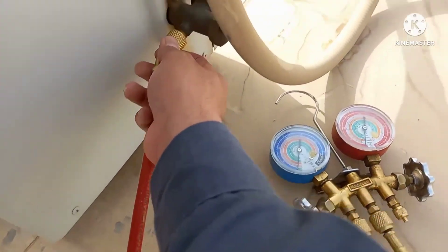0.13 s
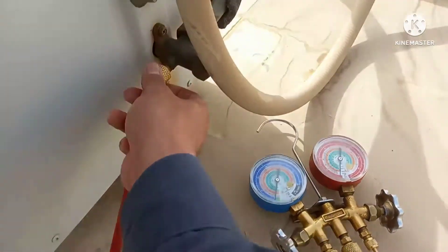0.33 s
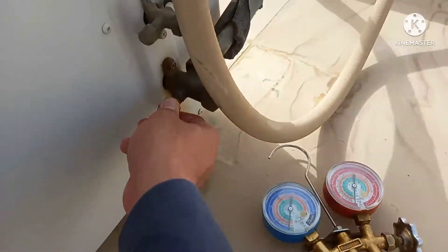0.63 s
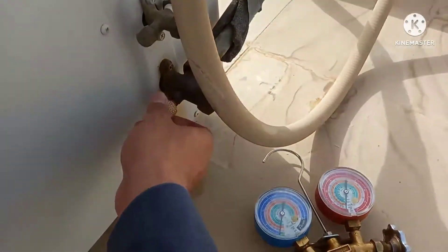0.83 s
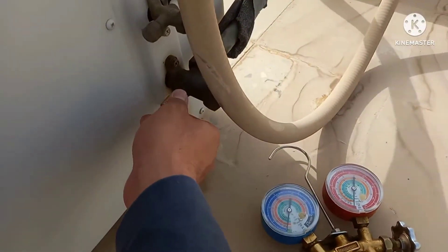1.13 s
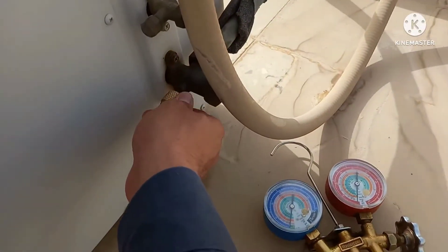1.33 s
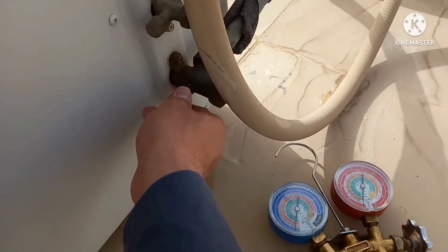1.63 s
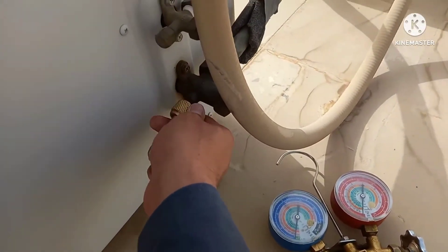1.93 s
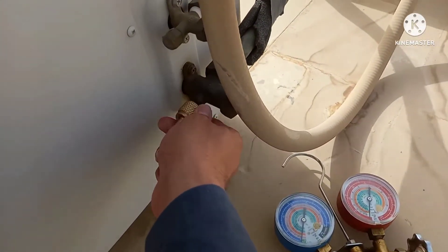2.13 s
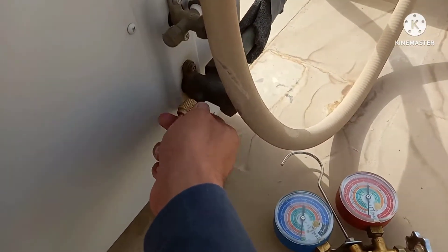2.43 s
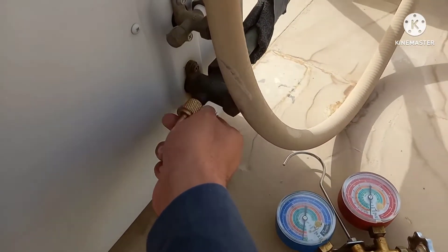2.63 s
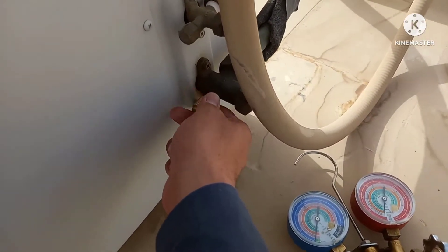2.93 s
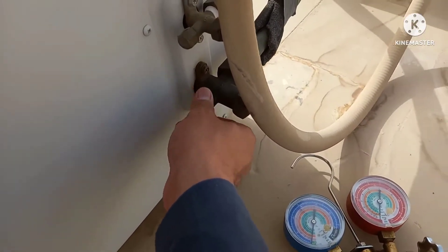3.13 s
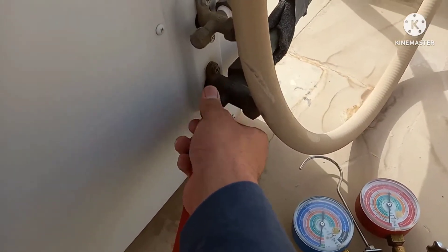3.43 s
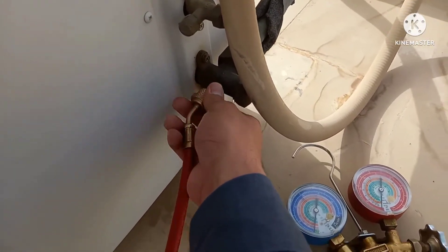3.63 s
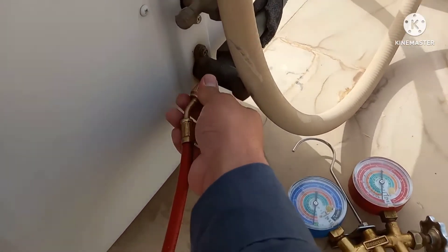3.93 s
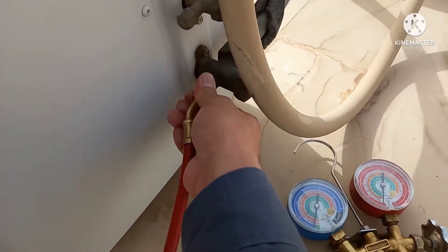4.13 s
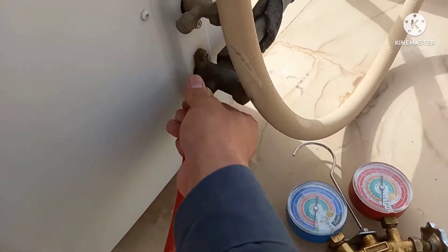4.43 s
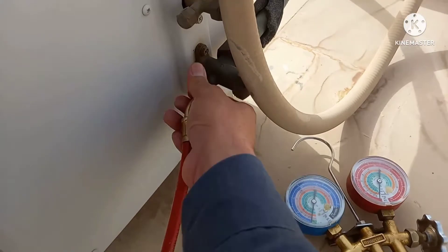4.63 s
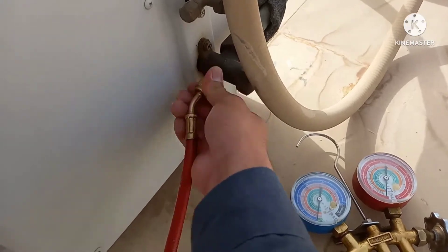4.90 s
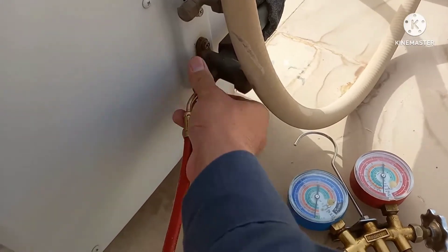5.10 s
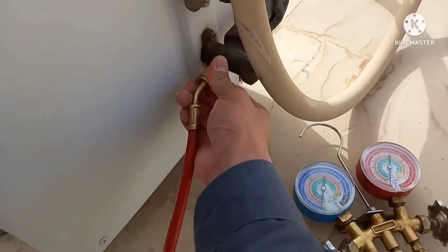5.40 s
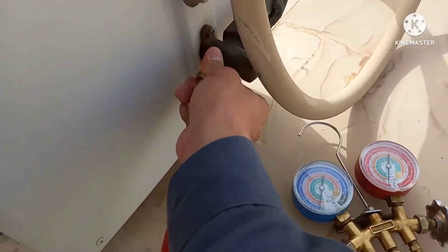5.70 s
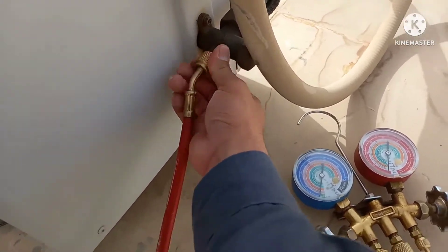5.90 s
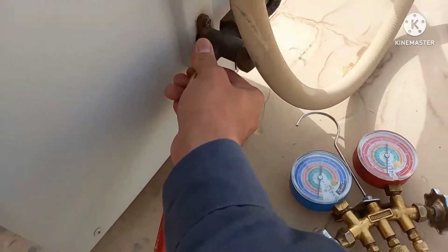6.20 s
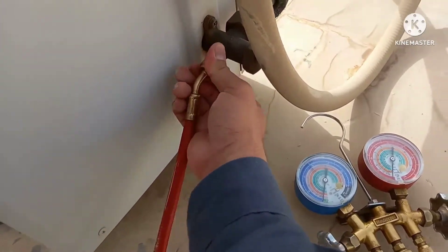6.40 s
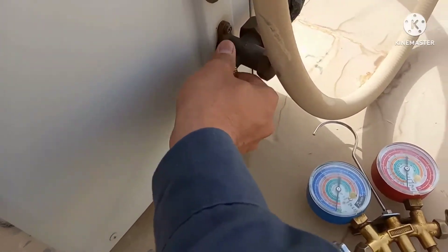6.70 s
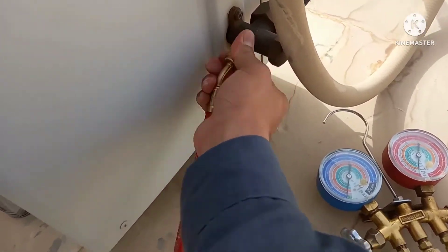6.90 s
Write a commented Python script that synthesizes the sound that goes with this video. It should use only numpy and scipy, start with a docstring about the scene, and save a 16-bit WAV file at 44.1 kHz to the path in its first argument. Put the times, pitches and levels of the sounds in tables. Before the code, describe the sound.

An outdoor air conditioner hums and blows steadily up close while a hand turns a brass fitting with small clicks and rasps.

```python
"""Rooftop air conditioner, close up

A stereo microphone moves in on an outdoor unit, which grows louder: the compressor hums, the fan throbs
and pushes air through the grille, and the mains hum beats against a second, slightly faster compressor.
A side panel's echo colours the rush. A hand turns a brass hose fitting on the service valve, with ticks,
rasps and soft rustles. Now and then an eddy of the fan's draught buffets the right microphone port."""
import sys
import numpy as np
from scipy.fft import rfft, irfft, next_fast_len
from scipy.io import wavfile
from scipy.ndimage import map_coordinates

SR = 44100
rng = np.random.default_rng(int(sys.argv[2]) if len(sys.argv) > 2 else 0)


def transcribe(signal):
    """Save signal, clipped to [-1, 1], as a 16-bit WAV file at the path in sys.argv[1]."""
    frames = np.atleast_2d(signal).T
    limited = np.clip(frames, -1, 1)
    pcm = np.round(limited * 32767).astype(np.int16)
    wavfile.write(sys.argv[1], SR, pcm)


N = 310949

COMPRESSOR_HZ, FAN_HZ, MAINS_HUM_HZ, NEIGHBOUR_HZ = 58.16, 14.99, 119.95, 58.605
LEFT_LAG_S = -24 / SR  # negative: the sound reaches the left port first

# closeness to the unit; each layer follows it by its own factor: (time [s], level [dB])
NEARNESS = [(0, -2), (0.75, -4), (1.4, 1.6), (2.6, 1.2), (3.7, 0.5), (4.4, -0.4), (6.1, -0.7), (6.7, 0.2),
            (7.05, -0.1)]
# compressor shaft harmonics: (order, left base level [dB], right base level [dB])
COMPRESSOR_TONES = [(1, -42, -40), (2, -46, -47), (3, -38, -38), (4, -37.5, -38), (5, -66, -51),
                    (6, -44.5, -40), (7, -42.5, -41.5), (8, -57, -54), (9, -53, -59), (10, -60, -58),
                    (13, -44, -52), (14, -47, -61), (15, -49.5, -61), (16, -54, -62), (17, -60, -76),
                    (18, -58, -64), (19, -65, -62), (26, -65, -70), (27, -59, -65), (28, -66, -71),
                    (30, -68, -68), (34, -71, -71), (97, -81, -79), (112, -79, -76)]
# shaft harmonics of the three-bladed fan: (order, left base level [dB], right base level [dB])
FAN_TONES = [(3, -42, -36.5), (4, -52, -57), (5, -52, -52), (6, -45, -39), (7, -49, -46), (9, -40, -37),
             (12, -52, -48), (15, -49, -50), (16, -49, -50), (18, -53, -51), (19, -57, -55)]
# blade tones along the microphone's path: (time [s], gain [dB])
BLADE_GAIN = [(0, -7), (0.8, -9.5), (1.6, -2), (2.6, 4.5), (4, 2.5), (5.5, 1.5), (6.4, 3.5), (7.05, -3.5)]
# blade turbulence inside the cabinet: (frequency [Hz], relative level [dB])
ROAR_SPECTRUM = [(25, -27), (36, -20), (44, -0.5), (55, -4.5), (135, 0.2), (190, -7.5), (222, -3),
                 (270, -9.5), (320, -10.5), (400, -14.5), (460, -28.5), (600, -21.5), (1000, -55),
                 (2000, -100)]
# surges of the roar at both ports: (time [s], length [s], lift [dB])
ROAR_SURGES = [(1.39, 0.13, 1), (2.517, 0.099, 3.5), (2.852, 0.14, 2), (3.24, 0.15, 1)]
# second compressor's upper harmonics: (order, left base level [dB], right base level [dB])
NEIGHBOUR_TONES = [(3, -45, -45), (4, -49, -49), (6, -53, -53), (7, -57, -57), (9, -58, -58)]
# air through coil and grille: (frequency [Hz], relative level [dB])
RUSH_SPECTRUM = [(260, -11.5), (450, 1), (498, -3.5), (694, -3.5), (775, -0.5), (840, 0.5), (1230, -16),
                 (1520, -14), (1880, -17.5), (2350, -16.5), (2930, -19), (3240, -20.5), (4340, -28),
                 (5000, -31.5), (6500, -74), (11000, -120)]
# the microphone's housing shades the left port from the upper rush: (frequency [Hz], gain [dB])
LEFT_SHADE = [(700, 1), (1200, 1), (1500, 1), (1800, -3.5), (2500, -3.5), (3200, -3.5), (3800, -3),
              (5000, 1)]
# fine hiss above the rush: (frequency [Hz], relative level [dB])
HISS_SPECTRUM = [(2650, 0), (4500, 0.5), (7040, -1.5), (7690, 1.5), (8390, 0), (9250, 0), (10500, -2),
                 (11500, -0.5), (14000, -5.5), (15400, -10)]
# side panel's echo, sooner as the microphone comes closer: (time [s], delay [ms])
PANEL_DELAY = [(0, 1.28), (1.0, 1.3), (1.9, 1.265), (2.2, 1.22), (2.8, 1.196), (3.4, 1.144), (4.0, 1.2),
               (5.2, 1.208), (6.3, 1.19), (6.7, 1.112), (7.05, 1.12)]
# strength of that echo: (frequency [Hz], gain [dB])
PANEL_REFLECTION = [(900, -40), (1800, -13), (3000, -8), (5000, -10), (7500, -14), (11000, -26)]
# bright clicks of the nut on the valve: (time [s], right peak [dB])
NUT_CLICKS = [(0.1731, -15), (1.038, -38), (3.7555, -34)]
# colour of those clicks: (frequency [Hz], relative level [dB])
NUT_SPECTRUM = [(900, -12), (1800, -2), (2400, -6), (2950, 3), (3700, 3.5), (4500, -1), (5400, -4),
                (7500, -6.5), (8860, -1.5), (11500, 0.5), (13000, -4), (15000, -6)]
# dry ticks: (time [s], peak before panning [dB], centre [Hz], width [octaves], t60 [s], pan left [dB])
FITTING_TICKS = [(0.397, -34, 1500, 0.2, 0.04, 4), (2.1912, -26, 1950, 0.45, 0.0015, -4)]
# rasping turns of the nut: (time [s], length [s], level [dB])
NUT_TURNS = [(0.07, 0.12, -56), (1.22, 0.04, -49), (1.3, 0.05, -47.5), (1.465, 0.085, -44),
             (2.0, 0.6, -51.5), (2.48, 0.17, -47.5), (2.67, 0.14, -46), (2.84, 0.05, -49),
             (3.55, 0.35, -53)]
# resonances of the rubbed fitting: (frequency [Hz], width [Hz], relative level [dB])
BRASS_MODES = [(1700, 190, 5.5), (2570, 210, 6), (3250, 140, 1.5)]
# resonances of the first turn's squeak: (frequency [Hz], width [Hz], relative level [dB])
SQUEAK_MODES = [(1635, 65, 5), (2620, 80, -7)]
# strokes of the hand on the hose: (time [s], length [s], level [dB])
HAND_STROKES = [(0.36, 0.06, -59), (1.91, 0.15, -50.5), (2.208, 0.05, -53), (2.42, 0.14, -56),
                (2.95, 0.041, -53), (3.166, 0.24, -57), (3.46, 0.13, -48), (4.022, 0.13, -52.5),
                (4.22, 0.02, -53), (4.55, 0.088, -51.5), (4.828, 0.06, -57), (5.24, 0.1, -54),
                (5.92, 0.16, -51.5), (6.48, 0.16, -55)]
# colour of their rustle: (frequency [Hz], relative level [dB])
RUSTLE_SPECTRUM = [(1000, -30), (2500, -1), (5000, 1.5), (7500, -0.5), (10000, 1.5), (12500, 1),
                   (15300, -5)]
# eddies on the right port: (time [s], length [s], level [dB])
PORT_EDDIES = [(3.738, 0.068, -17), (3.897, 0.095, -19.5), (4.503, 0.055, -22), (5.075, 0.075, -21),
               (5.245, 0.03, -22), (5.82, 0.04, -20), (6.15, 0.05, -25), (6.29, 0.04, -24)]
# their low rumble: (frequency [Hz], relative level [dB])
EDDY_SPECTRUM = [(20, -38), (45, -2), (80, 3.5), (130, 3), (230, -6), (330, -9), (500, -25),
                 (1200, -53), (4000, -80)]
# eddies breaking on the port: (time [s], envelope peak [dB], frequency [Hz], half-length [cycles])
PORT_THUMPS = [(3.75, -11.5, 100, 1.4), (3.865, -11, 110, 1), (3.8865, -13, 130, 1.2),
               (4.5017, -10.5, 150, 1.1), (4.525, -13.5, 70, 0.8), (5.043, -13, 115, 1.1),
               (5.06, -13, 110, 1), (5.0772, -8, 205, 1), (5.0865, -10, 200, 1.2), (5.103, -11.5, 100, 1),
               (5.843, -10.5, 100, 0.8), (6.301, -10, 135, 1.1)]
# the pipe's ring swells as the hand leans on it: (time [s], length [s], level [dB])
PIPE_SWELLS = [(3.2, 0.5, -58), (5.5, 0.29, -56), (6.65, 0.55, -53.5)]


def compressor(near_db):
    """The compressor hums on its shaft harmonics, louder close up."""
    return amp(0.81 * near_db) * shaft_tones(COMPRESSOR_HZ, COMPRESSOR_TONES, drift=.0003)


def fan(near_db):
    """Blade tones over a turbulent roar; one blade bites harder, so the roar throbs once a turn."""
    tones = shaft_tones(FAN_HZ, FAN_TONES, drift=.0007, waver_db=1.8, waver_rate=6)
    throb = 1 + .18 * np.sin(2 * np.pi * FAN_HZ * np.arange(N) / SR)
    surge_db = sum(db * swell(s, length) for s, length, db in ROAR_SURGES)
    roar_db = -28.5 + 0.49 * near_db + surge_db + 0.96 * wobble(13)
    roar = amp(roar_db) * throb * air(ROAR_SPECTRUM, shared=0.89, lag=0, right_db=0.5)
    return amp(curve(BLADE_GAIN)) * tones + roar


def beating_hums(near_db):
    """The mains hum and a second compressor drift in and out of step nearly three times a second."""
    t = np.arange(N) / SR - 2.5  # the hums are in step at 2.5 s
    phase = rng.uniform(0, 2 * np.pi)
    mains_db = -32.8 + 1.4 * near_db + 1.2 * wobble(4.6)
    mains = amp(mains_db) * np.sin(phase + 2 * np.pi * MAINS_HUM_HZ * t)
    drone = amp(-32.8) * np.sin(phase + 2 * np.pi * 2 * NEIGHBOUR_HZ * t)
    overtones = shaft_tones(NEIGHBOUR_HZ, NEIGHBOUR_TONES, drift=.001)
    return mains + amp(2.2 * near_db) * (drone + overtones)


def grille(near_db):
    """Air rushes through coil and grille; its hiss pulses faintly, twice per turn of the compressor."""
    rush_db = -37 + 0.68 * near_db + 0.98 * wobble(14)
    rush = amp(rush_db) * air(RUSH_SPECTRUM, shared=0.23, lag=LEFT_LAG_S, right_db=1.5)
    rush[0] = filtered(rush[0], colour(LEFT_SHADE))
    pulsing = 1 + 0.05 * np.sin(2 * np.pi * 2 * COMPRESSOR_HZ * np.arange(N) / SR)
    flutter_db = 0.75 * wobble(30) + 0.98 * wobble(250)
    hiss_db = -51.5 + 0.89 * near_db + flutter_db
    hiss = amp(hiss_db) * pulsing * air(HISS_SPECTRUM, shared=.3, lag=LEFT_LAG_S, right_db=2.5)
    return rush + hiss


def with_panel_echo(x):
    """The side panel echoes into the left port; the changing delay slides a comb through the noise."""
    bounced = filtered(x[0], colour(PANEL_REFLECTION))
    echo = map_coordinates(bounced, [np.arange(N) - curve(PANEL_DELAY) * SR / 1000])
    return np.array([x[0] + echo, x[1]])


def fitting():
    """The brass nut clicks brightly against the valve; under the fingers it only gives dry ticks."""
    out = np.zeros((2, N))
    for s, db in NUT_CLICKS:
        out += amp(db) * jolt(s, t60=0.015, crack_db=11, response=colour(NUT_SPECTRUM)) * left_gain(-9)
    for s, db, centre, width, t60, pan_db in FITTING_TICKS:
        band = lambda hz: np.exp(-(np.log2((hz + 1) / centre) / width) ** 2 / 2)
        out += amp(db) * jolt(s, t60, crack_db=20, response=band) * amp([[pan_db], [-pan_db]])
    return out


def jolt(s, t60, crack_db, response):
    """A jolt of the nut: a crack and the brief chatter after it, filtered and scaled to peak 1."""
    t = np.arange(SR // 20) / SR
    chatter = rng.standard_normal((2, len(t))) * amp(-60 * t / t60)
    chatter[:, 0] = amp(crack_db)
    placed = np.zeros((2, N))
    placed[:, round(s * SR):][:, :len(t)] = chatter
    sound = filtered(placed, response)
    return sound / np.abs(sound).max()


def threads():
    """The nut's threads rasp in tiny uneven slips that ring the brass; the first turn squeaks."""
    slips = rng.standard_normal((2, N)) * amp(2.5 * wobble(300))
    rasp = swells(NUT_TURNS) * ringing(slips, BRASS_MODES)
    squeak = amp(-43.5) * swell(s=0.072, length=0.115) * ringing(slips, SQUEAK_MODES)
    return rasp * left_gain(-5) + squeak * left_gain(-12)


def rustle():
    """Skin and sleeve brush the hose in tiny catches, bright and mostly on the right."""
    catches = amp(1.5 * wobble(45) + 2.5 * wobble(500))
    friction = air(RUSTLE_SPECTRUM, shared=0.11, lag=LEFT_LAG_S, right_db=3)
    return swells(HAND_STROKES) * unit(catches * friction)


def eddies():
    """The draught flutters on the right port, barely touching the left; the hardest eddies thump."""
    swirl = unit(filtered(rng.standard_normal(N), colour(EDDY_SPECTRUM)))
    flutter = swells(PORT_EDDIES) * unit(np.tanh(swirl / 2))
    thumps = np.zeros(N)
    for s, db, hz, cycles in PORT_THUMPS:
        t = np.arange(N) / SR - s
        thumps += amp(db) * np.sin(2 * np.pi * hz * t) * np.exp(-(t * hz / cycles) ** 2)
    return flutter * left_gain(-20) + thumps * left_gain(-16)


def pipe_ring():
    """The running unit rings the pipe on one narrow resonance, heard in faint swells."""
    vibration = rng.standard_normal((2, N))
    ring = unit(filtered(vibration, lambda hz: resonance(hz, centre=1580, width=130)))
    return swells(PIPE_SWELLS) * ring * left_gain(-2)


def shaft_tones(shaft_hz, orders, drift, waver_db=1.3, waver_rate=4):
    """Harmonics of a slightly unsteady shaft; those above 500 Hz meet the two ports out of step."""
    angle = 2 * np.pi * np.cumsum(shaft_hz * (1 + drift * wobble(1.955))) / SR
    out = np.zeros((2, N))
    for order, left_db, right_db in orders:
        hz = order * shaft_hz
        phase = order * angle + rng.uniform(0, 2 * np.pi)
        left_shift = 2 * np.pi * hz * LEFT_LAG_S * (hz > 500)
        waver = amp(waver_db * wobble(waver_rate))
        out += waver * np.array([amp(left_db) * np.sin(phase - left_shift), amp(right_db) * np.sin(phase)])
    return out


def air(spectrum, shared, lag, right_db):
    """Stereo noise of rms 1: a shared part, lag seconds late at the left port, and a diffuse part."""
    gain = colour(spectrum)
    delays = np.array([[lag], [0]])
    direct = filtered(rng.standard_normal(N), lambda hz: gain(hz) * np.exp(-2j * np.pi * hz * delays))
    diffuse = filtered(rng.standard_normal((2, N)), gain)
    return unit((np.sqrt(shared) * direct + np.sqrt(1 - shared) * diffuse) * amp([[0], [right_db]]))


def ringing(x, modes):
    """x through a bank of resonances, at rms 1."""
    return unit(filtered(x, lambda hz: sum(amp(db) * resonance(hz, c, w) for c, w, db in modes)))


def resonance(hz, centre, width):
    """A peak of gain 1; centre and width in Hz."""
    return 1 / (1 + ((hz - centre) / width) ** 2 * 2)


def filtered(x, response):
    """x through a complex frequency response."""
    size = next_fast_len(N + SR // 4)
    return irfft(rfft(x, size) * response(np.fft.rfftfreq(size, 1 / SR)), size)[..., :N]


def colour(points):
    """A frequency response through (frequency [Hz], level [dB]) points on a log axis."""
    freqs, db = np.transpose(points)
    return lambda hz: amp(np.interp(np.log(hz + 1), np.log(freqs + 1), db))


def curve(points):
    """One value per sample through (time [s], value) points."""
    return np.interp(np.arange(N) / SR, *np.transpose(points))


def swell(s, length):
    """A smooth, flat-topped bump centred on s seconds."""
    return np.exp(-np.abs(2 * (np.arange(N) / SR - s) / length) ** 3 / 2)


def swells(rows):
    """An envelope of bumps from (time [s], length [s], level [dB]) rows."""
    return sum(amp(db) * swell(s, length) for s, length, db in rows)


def wobble(rate):
    """A smooth random curve, rate knots a second."""
    coarse = np.arange(0, N + 64, 64)
    knots = rng.standard_normal(1024)
    return np.interp(np.arange(N), coarse, map_coordinates(knots, [coarse * rate / SR], mode="wrap"))


def left_gain(db):
    """Stereo gains that change only the left port."""
    return amp([[db], [0]])


def amp(db):
    """Decibels to gain."""
    return 10 ** (np.asarray(db) / 20)


def unit(x):
    """Scale to rms 1."""
    return x / np.sqrt(np.mean(x ** 2) + 1e-20)


def scene():
    """The running unit, its draught and the hand at the valve, all at close range."""
    near_db = curve(NEARNESS)
    machinery = compressor(near_db) + fan(near_db) + beating_hums(near_db)
    airflow = with_panel_echo(grille(near_db))
    return machinery + airflow + pipe_ring() + eddies() + rustle() + threads() + fitting()


def record(dry):
    """The microphone cuts the deepest bass and keeps nothing above its band limit."""
    low_cut_hz, low_cut_share, top_hz = 38, .78, 15500
    return filtered(dry, lambda hz: (hz < top_hz) * (1 - low_cut_share / (1 + (hz / low_cut_hz) ** 20)))


dry = scene()
out = record(dry)
transcribe(out)
```